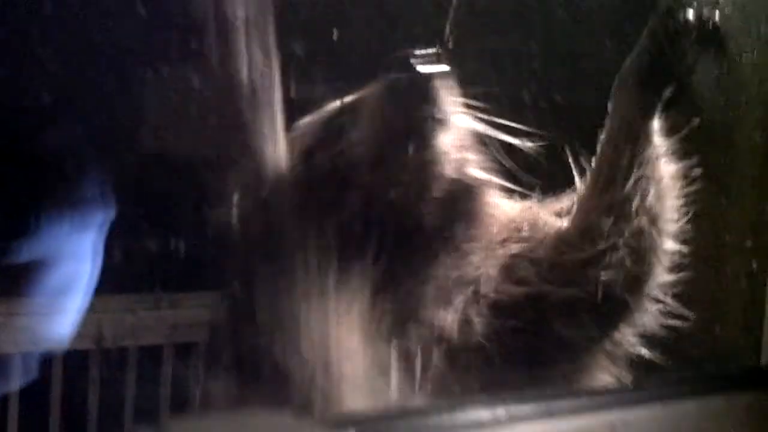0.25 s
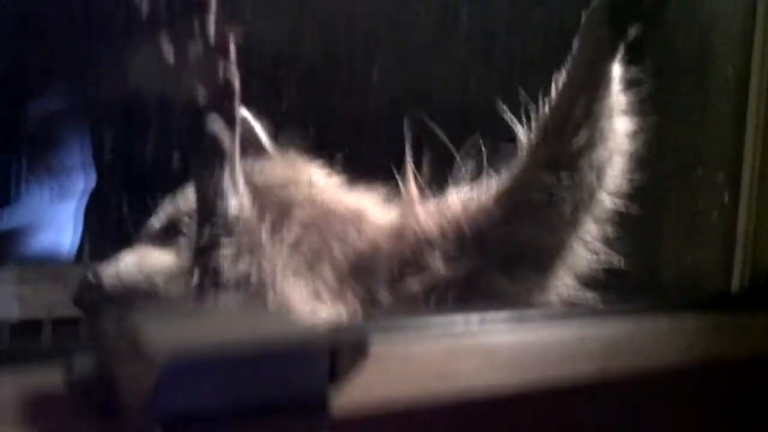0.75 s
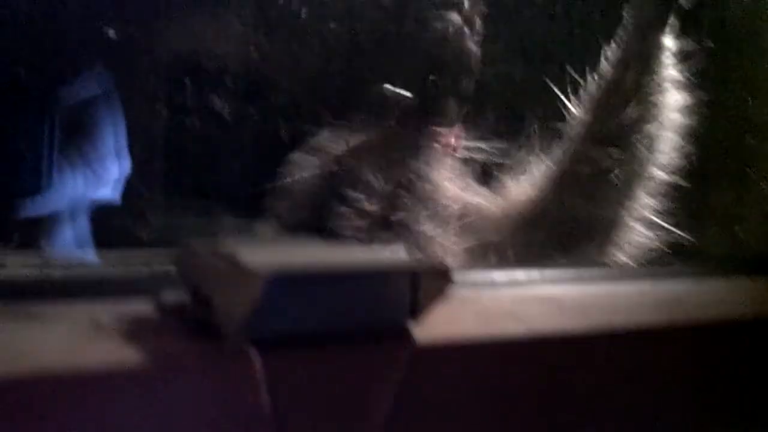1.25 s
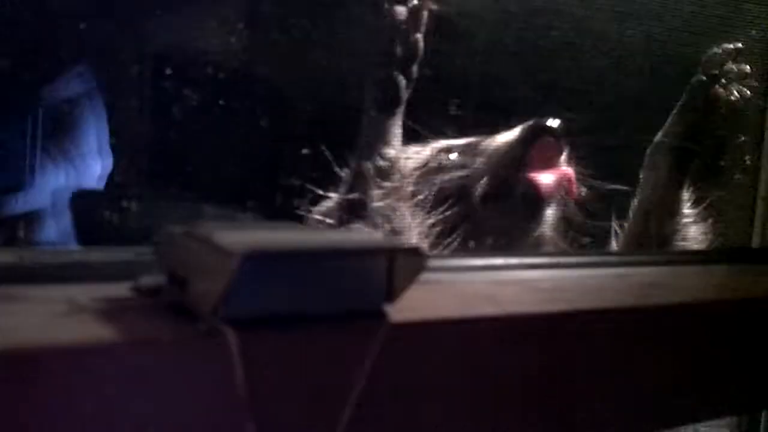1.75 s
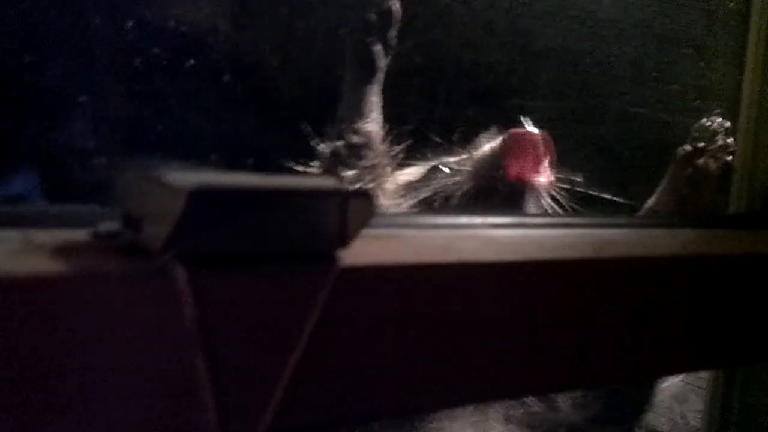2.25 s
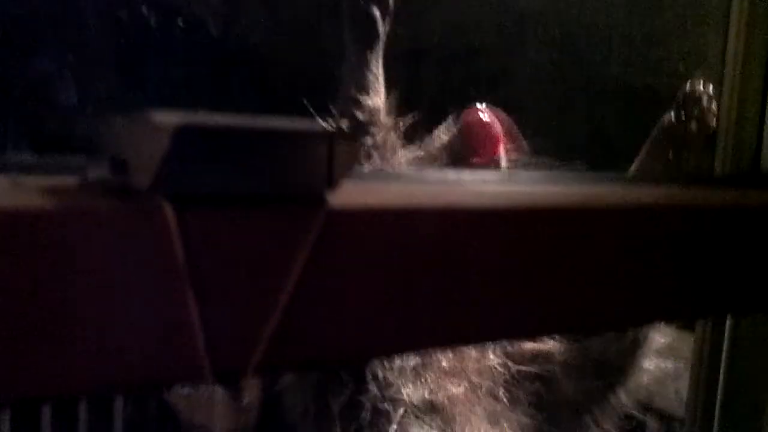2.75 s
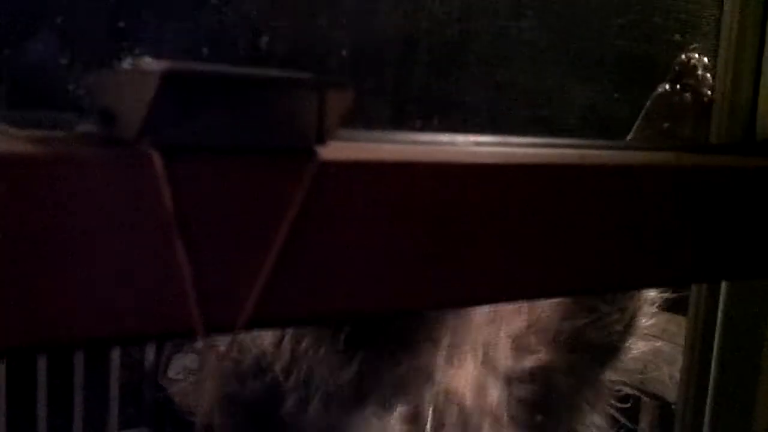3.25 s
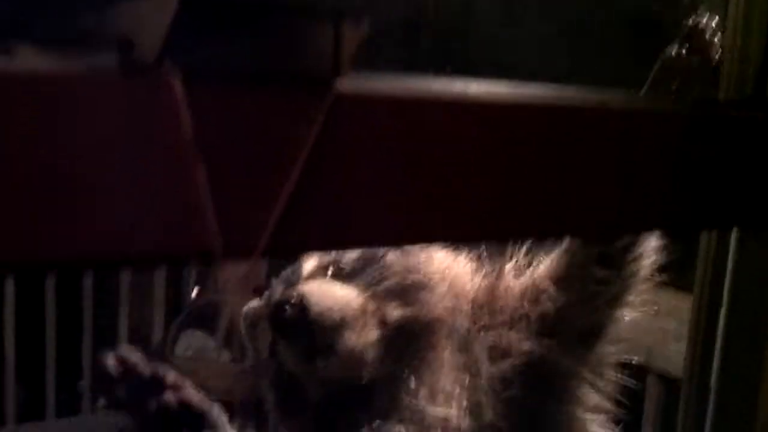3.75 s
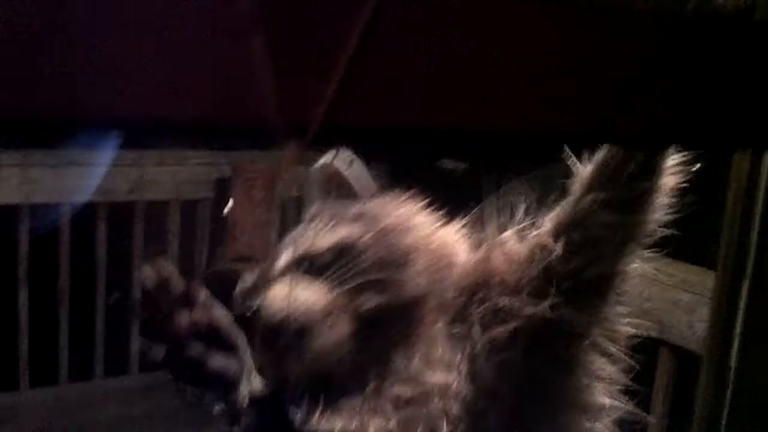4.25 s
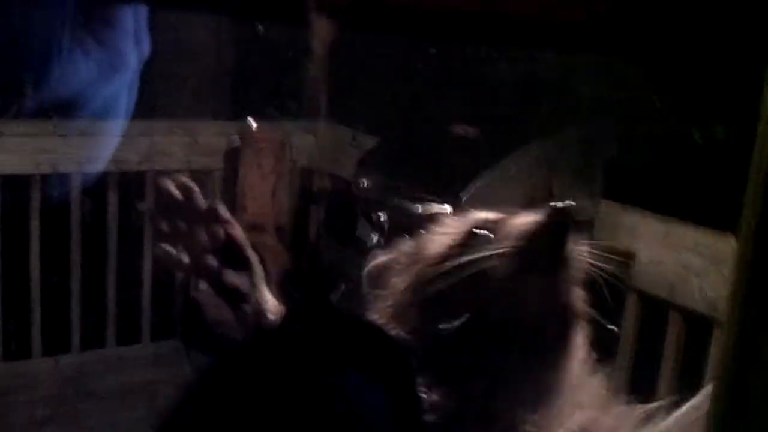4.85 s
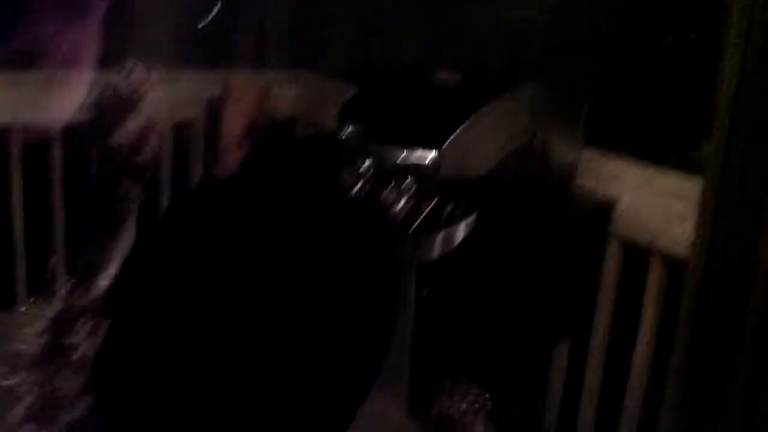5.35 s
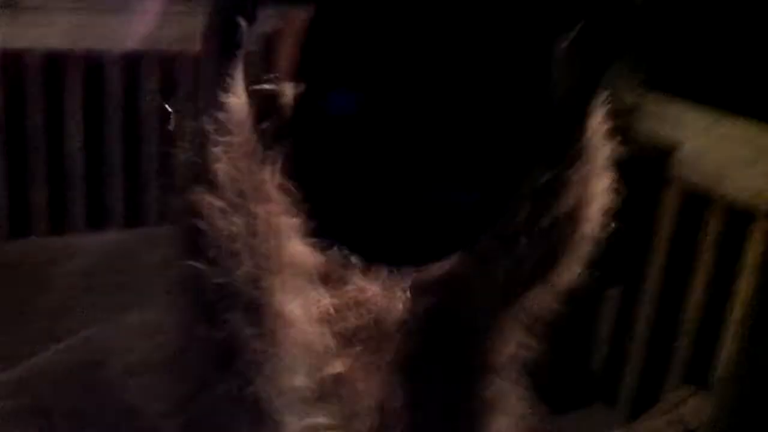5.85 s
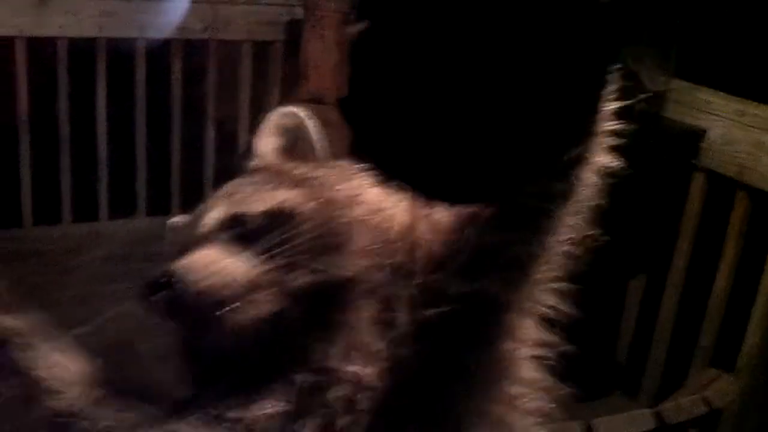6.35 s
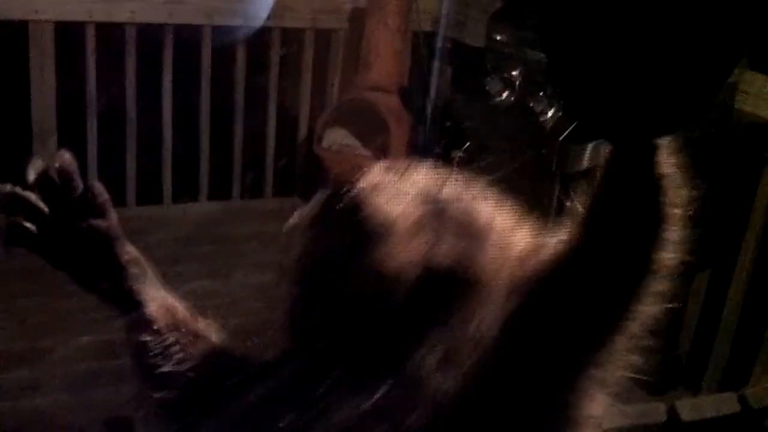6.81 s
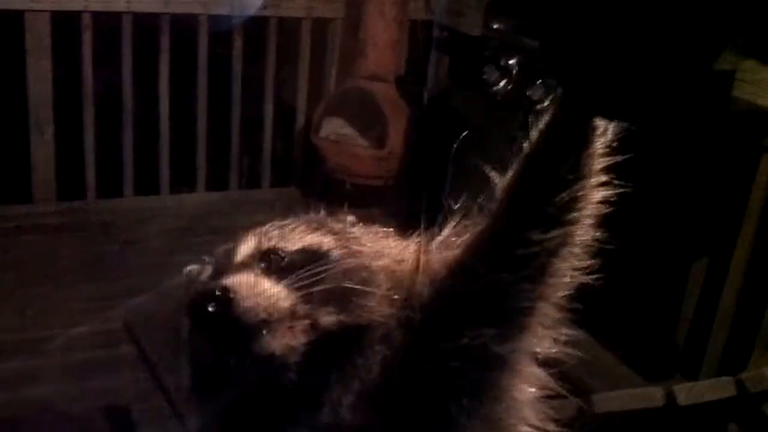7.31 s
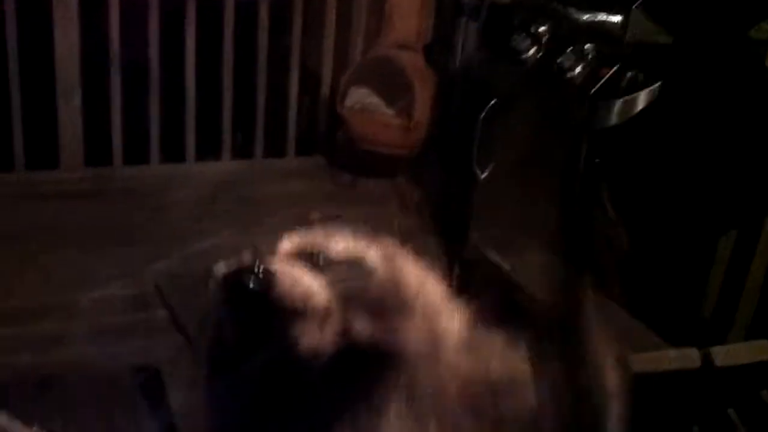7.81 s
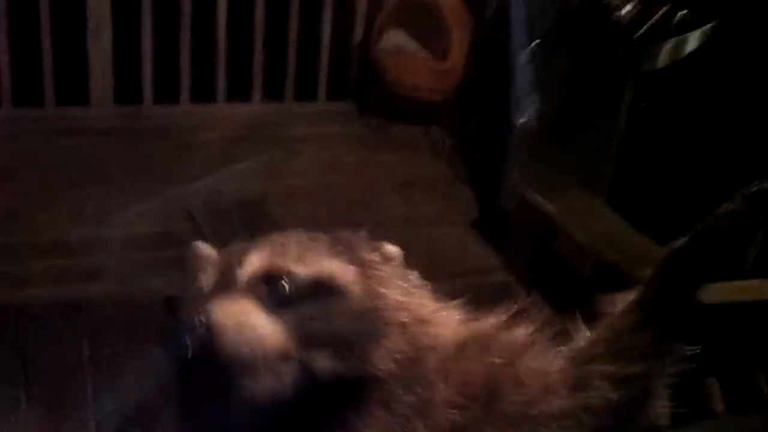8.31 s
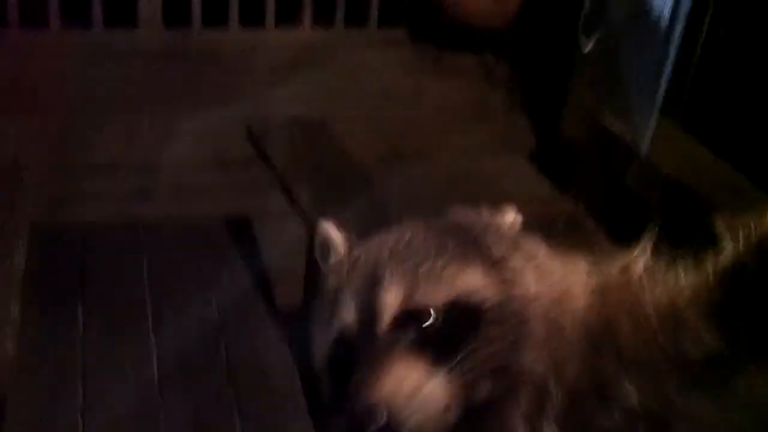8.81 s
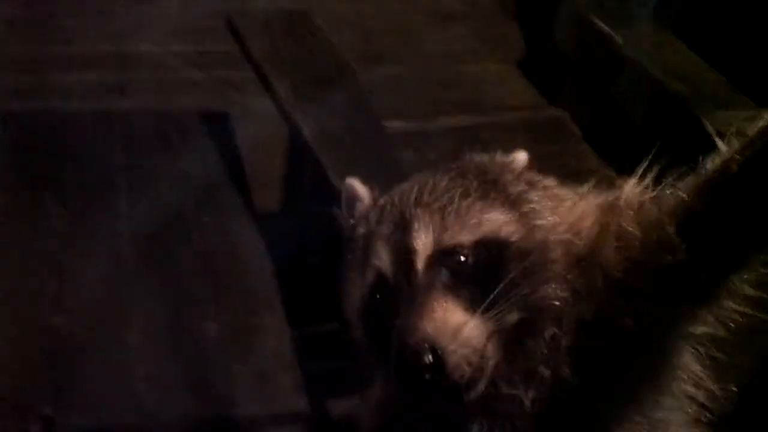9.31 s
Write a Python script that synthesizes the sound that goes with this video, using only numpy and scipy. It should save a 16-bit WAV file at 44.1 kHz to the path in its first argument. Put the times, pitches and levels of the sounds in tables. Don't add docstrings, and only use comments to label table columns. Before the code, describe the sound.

A quiet, low house hum with faint hiss runs throughout. From 0 to 0.6 s, claws tick and knock in a quick uneven cluster on a hollow plastic feeder; the shell gives short, dry mid-pitched clacks with a tiny bright crack, while the window pane booms softly. Sparse taps follow at 1.2-2.3 s. Around 2.5-2.8 s short scrapes squeak and rasp among knocks. Scattered taps continue from 2.8 s, with firmer hits near 4 s and a small flurry at 4.4 s. From 4.8 to 5.3 s come the loudest blows, with long gritty, squealing drags and heavy frame knocks. It calms, with a few shoves near 5.7 and 6.1 s, then thumps and light scrapes at 6.6-7.3 s and a knock with a faint drag near 7.6 s. From 8 s a rapid irregular claw patter runs until about 9.4 s. Close, dry, slightly wandering stereo.

```python
import sys
import numpy as np
from scipy import signal
from scipy.fft import rfft, irfft, next_fast_len
from scipy.io import wavfile
from scipy.ndimage import uniform_filter1d

SR = 44100
rng = np.random.default_rng(int(sys.argv[2]) if len(sys.argv) > 2 else 0)


def attenuation_scalar(level_db):
    decades = np.asarray(level_db, float) / 20
    return 10 ** decades


def int16_out(signal):
    q = np.round(np.clip(np.atleast_2d(signal).T, -1, 1) * 32767)
    wavfile.write(sys.argv[1], SR, q.astype(np.int16))


N = 422037
TIME = np.arange(N) / SR
HOP = 32
SIZE = next_fast_len(N + 8192)
LOG_HZ = np.log(np.arange(SIZE // 2 + 1) * SR / SIZE + 1)


def unit(x):
    return x / np.sqrt(np.mean(x ** 2))


def along(table, column):
    rows = np.array(table, float)
    return np.interp(LOG_HZ, np.log(rows[:, 0]), rows[:, column])


def shape(x, gain):
    return irfft(rfft(x, SIZE) * gain, SIZE)[:N]


def coloured(x, table):
    return shape(x, unit(attenuation_scalar(along(table, 1))))


def band(x, edges_hz, order):
    return signal.sosfilt(signal.butter(order, edges_hz, "band", fs=SR, output="sos"), x)


def walk(rate_hz):
    k = int(SR / HOP / rate_hz)
    count = N // HOP + 1
    held = np.repeat(rng.standard_normal(count // k + 1), k)
    return 1.3 * uniform_filter1d(held, k)[:count]


def gain_of(db):
    return np.repeat(attenuation_scalar(db), HOP)[:N]


def fading(t60, length_s, rows):
    t = np.arange(int(length_s * SR)) / SR
    return rng.standard_normal((rows, len(t))) * np.exp(-np.log(1000) * t / t60)


def ring(x, hz, t60):
    r = np.exp(-np.log(1000) / (t60 * SR))
    angle = 2 * np.pi * hz / SR
    gain = np.sqrt(2 * (1 - r ** 2)) * np.sin(angle)
    return signal.lfilter([gain], [1, -2 * r * np.cos(angle), r ** 2], x)


def near_centre_db(hz, centre_hz, fall_db):
    return -fall_db * np.log2(hz / centre_hz) ** 2


# pitch_hz, level_db (per Hz)
HUM = [(24, -94), (40, -5), (59, -21.5), (234, -8.5), (268, -14.5), (358, -6), (384, -11), (589, -14),
       (676, -24.5), (1150, -21.5), (2400, -28), (3120, -28.5), (5280, -120)]


def room():
    hum = unit(shape(rng.standard_normal(N), attenuation_scalar(along(HUM, 1))))
    return gain_of(-58 + 1.2 * walk(1.82)) * hum


# pitch_hz, level_db (per Hz)
CAPSULE_HISS = [(1000, -112), (2500, -109), (4000, -109), (8000, -115), (11000, -113), (15500, -107)]


def capsule_hiss():
    return shape(rng.standard_normal(N), attenuation_scalar(along(CAPSULE_HISS, 1)) * np.sqrt(SR))


def thumps(table, lead_s, rise_s, t60, hold, sag, rough_db, rough_hz):
    settle_s = 0.00653
    out = np.zeros(N + SR)
    t = TIME[:int(1.5 * t60 * SR)]
    fade = np.exp(-np.log(1000) * (t / t60) ** hold)
    swell = (1 - np.exp(-t / rise_s)) * fade
    bent = t + sag * settle_s * (1 - np.exp(-t / settle_s))
    for s, db, hz in table:
        start = int((s - lead_s) * SR)
        out[start:][:len(t)] += attenuation_scalar(db) * swell * np.sin(2 * np.pi * hz * bent)
    return out[:N] * gain_of(rough_db * walk(rough_hz))


# time_s, peak_db, pitch_hz
FRAME_KNOCKS = [(0.18, -42, 527), (0.221, -40.5, 520), (0.298, -30.5, 447), (0.402, -35, 498),
                (0.516, -33.5, 486), (1.19, -36, 495), (1.477, -31.5, 354), (1.889, -44.5, 501),
                (2.142, -55, 400), (2.296, -31.5, 476), (2.559, -34.5, 468), (2.657, -32, 495),
                (2.78, -36, 409), (3.032, -38, 356), (3.315, -42, 400), (3.457, -43, 475),
                (3.599, -42, 526), (3.705, -42, 460), (3.758, -49, 480), (3.95, -28, 476), (4.01, -26, 397),
                (4.13, -43.5, 614), (4.366, -36, 484), (4.838, -25, 268), (4.864, -26.5, 432),
                (5.08, -23, 330), (5.158, -20, 409), (5.507, -38, 361), (5.74, -30, 352),
                (6.634, -41.5, 483), (6.82, -32, 324), (6.93, -28, 301), (7.194, -38.5, 368),
                (7.606, -44, 655), (8.093, -35, 410), (8.133, -32.5, 600), (8.312, -31.5, 525),
                (8.392, -31, 495), (8.531, -41.5, 492), (8.628, -38, 333), (8.718, -31.5, 465),
                (8.84, -36, 497), (9.027, -37, 648), (9.187, -42, 570), (9.36, -40.5, 311)]


def frame_knocks():
    return attenuation_scalar(-3.5) * thumps(FRAME_KNOCKS, lead_s=0.00417, rise_s=0.0077, t60=0.093, hold=1.02,
                              sag=0.29, rough_db=7.34, rough_hz=260.)


# time_s, peak_db, pitch_hz
WINDOW_THUMPS = [(1.216, -41.5, 137), (0.253, -42.5, 137), (.305, -39.5, 205), (0.418, -52, 137.5),
                 (1.898, -40, 224), (2.567, -41, 200), (2.69, -30.5, 208), (2.937, -47.5, 230),
                 (3.059, -42, 211), (3.337, -45, 215), (3.343, -42.5, 139.3), (3.61, -40.5, 139),
                 (3.802, -42, 208), (4.163, -42.5, 132.5), (4.868, -28, 222.6), (5.081, -28, 205.7),
                 (5.751, -35, 202), (5.931, -43.5, 149), (6.14, -40, 136), (6.801, -30, 137.5),
                 (6.875, -38, 115), (6.975, -47, 150.5), (7.091, -67, 135), (9.19, -46, 350),
                 (6.95, -37, 275.4), (7.0, -47, 305), (8.16, -39, 303.3), (2.705, -43.5, 470),
                 (1.899, -46, 303), (7.212, -42, 140), (7.304, -46.5, 137), (7.661, -35, 142),
                 (5.16, -32, 126), (8.155, -34.5, 207.5), (8.221, -46, 210), (8.42, -36.5, 137),
                 (8.76, -42, 134), (8.979, -39, 147.5), (9.193, -35.5, 137), (.56, -54, 104), (1.24, -46, 98),
                 (6.925, -48, 108), (3.42, -44, 100), (6.169, -51, 100)]


def window_thumps():
    return thumps(WINDOW_THUMPS, lead_s=0.01523, rise_s=0.012, t60=0.2, hold=1.67,
                  sag=0.33, rough_db=1.5, rough_hz=30.)


def sway():
    rest_db, kick_db, t60 = -61, -11.5, 0.8
    power = np.full(N, attenuation_scalar(rest_db) ** 2)
    for s, db, _ in WINDOW_THUMPS:
        fade_db = 60 * np.abs(TIME - s) / t60
        power += (TIME > s) * attenuation_scalar(db + kick_db - fade_db) ** 2
    return np.sqrt(power)


def slips(rate_hz, scatter_db):
    chance = rate_hz / SR * gain_of(2.1 * walk(45.))
    size = attenuation_scalar(scatter_db * np.minimum(rng.exponential(size=N), 3))
    clicks = (rng.random(N) < chance) * size
    return unit(clicks * rng.standard_normal(N))


def contacts(db, t60, late_s, blow):
    length_s, load_s = .06, 0.00033
    bursts = fading(t60, length_s, rows=len(db))
    bursts *= 1 - np.exp(-TIME[:int(length_s * SR)] / load_s)
    bursts /= np.sqrt(np.sum(bursts ** 2, axis=1, keepdims=True))
    bursts[:, 0] += blow
    start = ((taps()[:, 0] + late_s) * SR).astype(int)
    force = np.zeros(N + SR)
    np.add.at(force, start[:, None] + np.arange(bursts.shape[1]), bursts * attenuation_scalar(db)[:, None])
    return force[:N]


def body(modes, blows, favour_db, scatter_db, rubbing, lag_s):
    prompt_hz = 1700
    tap_samples = taps()[:, 0] * SR - 1
    latest_tap = np.clip(np.searchsorted(tap_samples, np.arange(N)) - 1, 0, None)
    scatter = scatter_db * rng.standard_normal((len(tap_samples), len(modes)))
    share = attenuation_scalar(np.array(modes)[:, 1] + favour_db + scatter)
    share /= np.sqrt(np.sum(share ** 2, axis=1, keepdims=True))
    out = np.zeros(N)
    for k, (hz, db, t60) in enumerate(modes):
        delay = int(lag_s * SR * max(np.log2(prompt_hz / hz), 0))
        push = np.roll(blows * share[latest_tap, k], delay)
        out += ring(push + rubbing(hz, db), hz, t60)
    return out


# pitch_hz, level_db, fade_s (time to fall 60 dB)
PANE_MODES = [(88, -44, .15), (127.7, -18, 0.47), (143.7, 0.5, 0.21), (201, -4.5, 0.17),
              (235.2, -4.5, 0.17), (307, -1, 0.064), (367, -2, 0.11), (409, -1, 0.068), (471.5, -5.5, 0.11),
              (491.2, -3.5, 0.064), (600, -14, 0.021), (695, 0.5, 0.014)]


def pane_boom():
    rocking = sway() * slips(900., scatter_db=2.2)

    def rubbing(hz, db):
        return gain_of(db - 10.5 + 2.5 * walk(25.)) * rocking

    _, peak_db, _, _, _, _, boom_db = taps().T
    blows = contacts(peak_db + boom_db + 28.0, 0.12, late_s=0.00305, blow=0.045)
    return body(PANE_MODES, blows, 0, 3.65, rubbing, lag_s=0.00041)


# time_s (most pressure), rise_s, fall_s, level_db, pitch_hz (scrape centre)
DRAGS = [(2.47, 0.01, 0.15, -48, 1550), (2.573, 0.072, 0.085, -40, 1420),
         (2.678, 0.074, 0.071, -44.5, 1390), (2.699, 0.045, 0.02, -43, 950),
         (3.435, 0.039, 0.038, -49, 1750), (4.13, 0.026, 0.056, -41, 1500), (4.601, 0.089, 0.07, -58, 1700),
         (4.66, 0.033, 0.034, -55, 1700), (4.749, 0.054, 0.058, -51, 1700),
         (4.844, 0.0077, 0.24, -33, 1240), (4.95, 0.12, 0.29, -24, 2790), (5.043, 0.06, 0.31, -33, 1650),
         (5.13, 0.13, 0.16, -29.5, 1300), (5.235, 0.23, 0.056, -31.5, 1580), (5.652, .012, 0.12, -58, 1650),
         (6.177, 0.018, 0.0076, -47, 1710), (6.33, 0.011, 0.018, -57, 1400),
         (6.429, 0.0054, 0.014, -50, 1500), (6.757, .006, 0.011, -48, 1800),
         (6.788, 0.0166, 0.093, -41.5, 1500), (6.86, .05, 0.11, -49.5, 1600),
         (6.905, 0.063, 0.067, -46.5, 1510), (6.96, 0.034, 0.076, -46.5, 1100),
         (7.669, 0.011, 0.19, -46.5, 1420), (7.775, 0.018, 0.073, -53, 1750),
         (7.888, .012, 0.025, -51, 1420), (8.006, 0.054, 0.027, -52.5, 1700), (8.84, .03, 0.045, -64, 1700),
         (9.362, 0.18, 0.021, -54, 1520)]


def strokes():
    fade_db = 26.5
    glide_oct_s, arch_oct = 0.56, 0.3
    db, hz, slack = np.full(N, -120.), np.full(N, 1500.), np.ones(N)
    for s, rise, fall, peak_db, centre_hz in DRAGS:
        span = slice(int((s - rise) * SR), int((s + fall) * SR))
        t = TIME[span] - s
        loose = np.maximum(-t / rise, t / fall)
        now_db = peak_db - fade_db * loose
        now_hz = centre_hz * 2 ** (glide_oct_s * t - arch_oct * loose)
        leads = now_db > db[span]
        hz[span] = np.where(leads, now_hz, hz[span])
        db[span] = np.where(leads, now_db, db[span])
        slack[span] = np.where(leads, loose, slack[span])
    pressure = uniform_filter1d(attenuation_scalar(db), size=300)
    rasp = attenuation_scalar(-11 - 0.31 * (db + 49.5))
    return pressure, hz, rasp, slack


# pitch_hz, level_db
RASP_COLOUR = [(2200, -51), (2800, 13), (3800, -30), (5000, 6.5), (7000, -4.5), (10000, -10), (16000, -32)]


def rasp_noise(rasping):
    return coloured(attenuation_scalar(0.5) * rasping, RASP_COLOUR)


def squeal(rasping, slack):
    now_hz = 3640 * 2 ** (-0.2 * slack[::HOP])
    out = np.zeros(N)
    for hz in np.geomspace(2900, 5000, num=7):
        out += ring(gain_of(near_centre_db(hz, now_hz, 230.0)) * rasping, hz, t60=0.011)
    return attenuation_scalar(-7.5) * out


# start_s, length_s, first_pitch_hz, last_pitch_hz, level_db
SINGING_CLAWS = [(2.473, 0.063, 1780, 1750, -64), (2.518, 0.021, 1800, 1650, -49),
                 (2.532, 0.026, 1420, 1330, -39), (2.545, 0.051, 1500, 1220, -38),
                 (4.902, 0.034, 1480, 1460, -34), (4.887, 0.067, 2147, 2370, -33),
                 (4.945, 0.038, 2050, 1880, -30.5), (4.99, 0.028, 1500, 1910, -43),
                 (5.028, 0.023, 1650, 1610, -27), (8.778, .018, 1700, 1860, -59),
                 (2.684, 0.038, 1726, 1780, -45.5), (4.115, 0.08, 1682, 1720, -51.5)]


def squeaks():
    out = np.zeros(N)
    wobble = 0.0416 * np.repeat(walk(150.), HOP)
    for s, length, first_hz, last_hz, db in SINGING_CLAWS:
        start, count = int(s * SR), int(length * SR)
        hz = np.linspace(first_hz, last_hz, num=count) * (1 + wobble[start:start + count])
        phase = 2 * np.pi * np.cumsum(hz) / SR
        tone = np.sin(phase) + attenuation_scalar(-20) * np.sin(2 * phase) + attenuation_scalar(-25) * np.sin(3 * phase)
        out[start:start + count] += attenuation_scalar(db) * np.sqrt(np.hanning(count)) * tone
    return out * gain_of(4.3 * walk(170.))


# pitch_hz, level_db
CRACK_COLOUR = [(2200, -3.5), (2800, 11), (4000, 0.5), (5500, 9), (7000, -3.5), (9500, -11), (12000, -20),
                (16000, -19)]


def crack():
    _, peak_db, _, crack_db, _, chatter_t60, _ = taps().T
    snaps = contacts(peak_db + crack_db + 29, 1.7 * chatter_t60[:, None], late_s=0.00081, blow=0.21)
    return coloured(snaps, CRACK_COLOUR)


def patchy(x):
    edges_hz = [1500, 3300, 4300, 5500, 7000, 9500, 17000]
    out = np.zeros(N)
    for pair in zip(edges_hz, edges_hz[1:]):
        out += gain_of(2.2 * walk(45.) + 0.5) * band(x, pair, order=2)
    return out


# time_s, peak_db, pitch_hz (of the spot), crack_db (over the peak)
TICKS = [(0.029, -32, 1580, -21), (0.118, -32.5, 1670, -36), (0.164, -34, 1650, -24),
         (0.4572, -33.5, 1210, -20.5), (0.5112, -28.5, 1430, -23), (0.5556, -33, 1260, -26),
         (1.3872, -37, 1820, -25), (1.475, -23.5, 1820, -19.5), (1.6489, -34, 1750, -25),
         (1.7641, -33.5, 1240, -19.5), (2.018, -36, 1220, -24), (2.8472, -31, 1750, -29),
         (2.8915, -25, 1750, -27.5), (2.9639, -29.5, 1270, -31), (3.029, -34, 1750, -21),
         (3.311, -29.5, 1700, -27), (3.5866, -30, 1750, -23), (3.7515, -29.5, 1750, -30),
         (3.7578, -22, 1760, -27.5), (3.9455, -20.5, 1300, -23.5), (4.0065, -23.5, 1660, -21.5),
         (4.8338, -16.5, 1750, -25.5), (4.9026, -18, 1650, -17.5), (4.9282, -28.5, 1600, -28),
         (5.036, -21.5, 1650, -33), (5.1239, -13.5, 1620, -22.5), (5.2217, -10, 1770, -22.5),
         (5.5995, -36, 1590, -28), (6.6283, -27, 1930, -18), (6.9604, -20, 1440, -28.5),
         (7.5094, -40, 1960, -28), (7.6065, -19, 1400, -24.5), (7.9855, -37, 1470, -23),
         (8.0244, -39.5, 1650, -23), (8.216, -33, 1650, -28), (8.309, -18, 1500, -23.5),
         (8.5278, -22.5, 1910, -19.5), (8.6096, -34, 1510, -17), (8.6252, -22, 1590, -21.5),
         (8.7145, -20.5, 1370, -31), (8.8758, -21.5, 1720, -24), (8.8892, -22, 1800, -22),
         (8.9437, -30.5, 1960, -15.5), (8.9978, -38.5, 1840, -23), (9.0283, -25, 1850, -22),
         (9.0388, -23, 1570, -21), (9.186, -16.5, 1630, -22.5)]
KNOCKS = [(0.1766, -32, 1620, -18), (1.2409, -35.5, 1640, -27), (1.3235, -30, 1750, -29),
          (1.4962, -20.5, 1450, -26), (1.511, -26, 1550, -26), (1.8874, -24, 1750, -26),
          (2.157, -25.5, 1760, -20), (2.173, -26, 1740, -30), (2.2935, -21, 1810, -25),
          (2.4406, -41, 1750, -15), (2.5764, -29, 1290, -30), (2.7767, -21, 1700, -22),
          (3.04, -28.5, 1700, -26), (3.3206, -28, 1670, -23.5), (3.4504, -28, 1750, -28),
          (3.5955, -31, 1420, -26), (3.705, -28.5, 1750, -24), (4.365, -28.5, 1750, -17),
          (4.3805, -26, 1410, -18), (4.4059, -30.5, 1690, -22), (5.463, -34.5, 1680, -24),
          (5.7034, -31, 1750, -29), (5.774, -32, 1080, -25), (5.9025, -34, 1720, -21.5),
          (5.9233, -31.5, 1340, -31), (6.1435, -27.5, 1400, -22), (6.7794, -24.5, 1700, -20.5),
          (7.0541, -25.5, 1720, -28), (7.1847, -22, 1670, -21), (7.2743, -37, 1680, -23),
          (7.2947, -29, 1330, -21), (7.645, -23, 1350, -24), (7.6867, -30, 1480, -35),
          (8.1336, -22.5, 1450, -24.5), (8.2034, -32.5, 1440, -26), (8.3901, -20, 1410, -26),
          (8.4013, -28, 1370, -13), (8.4155, -22.5, 1420, -26), (8.6418, -22, 2070, -26.5),
          (8.956, -28.5, 1650, -24), (9.0926, -29.5, 1650, -22), (9.3668, -32.5, 1500, -16.5)]
SHOVES = [(0.2148, -30, 1850, -23.5), (0.2974, -29, 1160, -32), (0.3896, -25.5, 1840, -22.5),
          (1.1791, -29, 1730, -22.5), (2.6542, -27, 1430, -32), (2.6689, -32.5, 1720, -10),
          (2.7431, -38, 1740, -26), (2.7921, -30, 1760, -32), (3.3461, -31.5, 1750, -26),
          (3.3917, -47, 1640, -16), (3.4093, -32.5, 1750, -26), (3.668, -39, 1720, -23),
          (4.021, -31.5, 1680, -22), (4.1305, -32.5, 1660, -12.5), (4.1635, -35, 1180, -16),
          (4.4206, -32, 1770, -20), (4.8624, -17.5, 1050, -25), (5.07, -18, 1670, -19.5),
          (5.0933, -20, 1100, -13), (5.1476, -13.5, 1060, -26.5), (5.1952, -22, 1680, -16),
          (5.238, -29, 1060, -30), (5.5012, -34, 1750, -19.5), (5.7333, -22.5, 1080, -26),
          (5.7495, -22.5, 1090, -28), (6.1237, -29.5, 1340, -21.5), (6.4448, -38.5, 1710, -20),
          (6.9328, -29, 955, -28), (7.1954, -39, 1300, -16), (7.867, -33, 1050, -30),
          (7.9359, -35, 990, -28), (8.0955, -39.5, 1430, -26), (8.1534, -28, 1640, -23),
          (8.1661, -38, 1450, -28), (8.7739, -37.5, 1780, -15)]
BRUSHES = [(.198, -36, 1950, -34), (.4995, -33, 1480, -26), (.521, -30, 1490, -22), (1.349, -41, 1600, -24),
           (2.4654, -41, 1300, -24), (2.4815, -41, 1760, -21), (2.5343, -35, 1350, -30),
           (2.5516, -36, 1510, -18), (2.5636, -26, 1320, -29), (2.6465, -33.5, 1480, -18),
           (3.686, -44, 1740, -15), (4.1127, -44, 1650, -23), (4.6394, -41.5, 1600, -9.5),
           (5.2028, -26, 1670, -32), (5.3809, -36.5, 1610, -28), (5.4004, -33.5, 1615, -24),
           (6.8042, -33.5, 1520, -16), (6.8953, -30.5, 1610, -30), (8.375, -28.5, 1510, -22),
           (8.8174, -41, 1770, -25), (8.836, -37, 1950, -24), (8.8671, -29.5, 1900, -24),
           (9.132, -43, 1760, -15), (9.1764, -24.5, 1230, -20.5), (9.2379, -51, 1250, -21),
           (9.309, -42, 1910, -17), (9.3355, -41, 1410, -22), (9.3906, -50, 1040, -25),
           (9.366, -46, 2350, -21.5), (1.19, -34, 1910, -25), (.112, -41, 1700, -30),
           (3.579, -34, 1100, -25), (7.2, -33, 1690, -25), (7.148, -49, 1900, -23),
           (7.2818, -32.5, 1650, -26), (5.1565, -23, 1100, -26)]


def taps():
    kinds = [(TICKS, (0.6, 0.033, -18.5)), (KNOCKS, (0.53, 0.051, -16)),
             (SHOVES, (0.56, 0.051, -10)), (BRUSHES, (0.26, .045, -14))]
    return np.array(sorted((*row, *push) for table, push in kinds for row in table))


# pitch_hz, level_db, fade_s (time to fall 60 dB)
SHELL_MODES = [(810, 14, 0.017), (895, -4.5, 0.1), (1011, 1, 0.056), (1100, 1.5, 0.023), (1187, -7.5, 0.13),
               (1330, -4, 0.13), (1431, 2, 0.027), (1550, -4.5, 0.03), (1650, 2.5, 0.028), (1755, 2, 0.028),
               (1840, 7, 0.0037), (2050, -5, 0.03), (2200, -5.5, 0.032), (2500, -6, 0.024)]


def shell_ring(scrape, drag_hz):
    def rubbing(hz, db):
        nearness_db = near_centre_db(hz, drag_hz[::HOP], 33.7)
        return gain_of(db - 11.5 + nearness_db + 3 * walk(40.)) * scrape

    _, peak_db, spot_hz, _, blow, chatter_t60, _ = taps().T
    mode_hz, spot_hz = np.array(SHELL_MODES)[:, 0], spot_hz[:, None]
    favour_db = near_centre_db(mode_hz, spot_hz, fall_db=27)
    favour_db += 10 * np.exp(-(np.log2(mode_hz / spot_hz) / 0.093) ** 2)
    blows = contacts(peak_db + 12.0, chatter_t60[:, None], late_s=0., blow=blow)
    return body(SHELL_MODES, blows, favour_db, 2.4, rubbing, lag_s=0.0013)


def claws():
    pressure, drag_hz, rasp, slack = strokes()
    scrape = pressure * slips(3200., scatter_db=2.8)
    rasping = rasp * scrape
    shell = band(shell_ring(scrape, drag_hz), [720, 2700], order=3)
    window = band(pane_boom() + window_thumps() + frame_knocks(), [115, 4000], order=3)
    contact_noise = patchy(crack() + rasp_noise(rasping))
    return shell + window + contact_noise + squeal(rasping, slack) + squeaks()


def tail(t60, length_s):
    noise = fading(t60, length_s, rows=1)[0]
    return noise / np.linalg.norm(noise)


# pitch_hz, in_step (ratio), quarter_turn_ahead (ratio), unrelated_db
PORT_DIFFERENCE = [(40, 0.011, 0, -7), (100, -0.18, 0.005, -8), (252, 0.11, 0, -9.5),
                   (814, 0.22, 0.053, -1.5), (1300, 0.53, 0.037, 1), (1750, -0.38, 0.99, 3.5),
                   (2260, -1.4, 0.26, -8.5), (3036, 0.94, 0, 1), (8750, 0.58, 0.058, 1.5)]


def port_difference(common, scattered):
    wandering = common * gain_of(2.2 * walk(9.) - 2.0)
    turn = along(PORT_DIFFERENCE, 1) + 1j * along(PORT_DIFFERENCE, 2)
    return shape(wandering, turn) + shape(scattered, attenuation_scalar(along(PORT_DIFFERENCE, 3)))


def scene():
    near = claws()
    echo = signal.fftconvolve(near, tail(0.38, length_s=0.32))[:N]
    common = near + attenuation_scalar(-16) * echo + room()
    scatter = signal.fftconvolve(near, tail(0.09, length_s=.3))[:N]
    scattered = attenuation_scalar(-8.5) * scatter + room()
    apart = port_difference(common, scattered)
    return np.array([common + apart + capsule_hiss(), common - apart + capsule_hiss()])


# pitch_hz, limit_db
MASK_LIMIT = [(700, -40), (1300, -15), (2800, -14), (5500, -9), (8000, -5), (11000, -3), (16000, -3)]


def drop_masked(sides):
    pair = np.array([sides[0] + sides[1], sides[0] - sides[1]]) / 2
    hz, _, spectra = signal.stft(pair, SR, nperseg=2048)
    power = np.abs(spectra[:, :-1]) ** 2
    band_power = power.reshape(2, -1, 8, power.shape[-1]).mean(axis=2)
    bands = np.repeat(band_power, 8, axis=1)
    limit = attenuation_scalar(np.interp(hz[:-1], *np.transpose(MASK_LIMIT))) ** 2
    spectra[:, :-1] *= bands > limit[:, None] * bands[::-1]
    mid, side = signal.istft(spectra, SR, nperseg=2048)[1][:, :N]
    return np.array([mid + side, mid - side])


def low_pass(x):
    return signal.sosfilt(signal.butter(12, 16930, fs=SR, output="sos"), x)


def record(dry):
    lag = 16
    other_late = np.pad(dry[::-1], ((0, 0), (lag, 0)))[:, :N]
    lift = signal.bilinear([1, 2 * np.pi * 600], [1, 2 * np.pi * 60], SR)
    lifted = signal.lfilter(*lift, dry - other_late) / np.sqrt(2)
    sides = band(lifted, [80, 19000], order=2)
    top_cut = signal.ellip(10, .3, 80, 15800, fs=SR, output="sos")
    mix = drop_masked(signal.sosfilt(top_cut, sides))
    return low_pass(mix)


dry = scene()
out = record(dry)
int16_out(out)
```